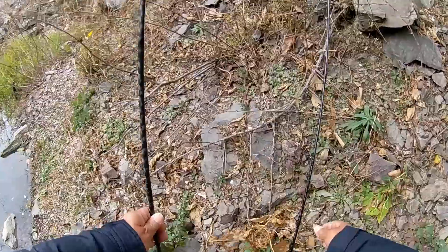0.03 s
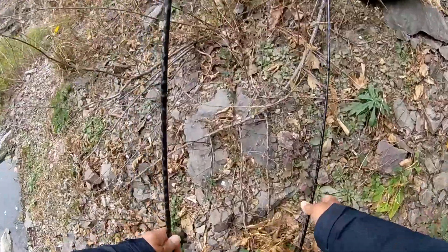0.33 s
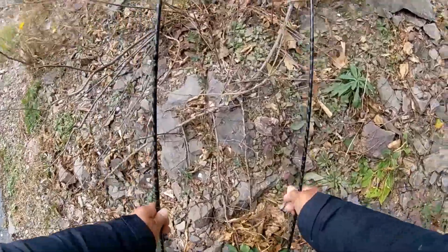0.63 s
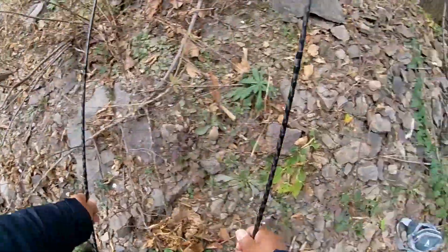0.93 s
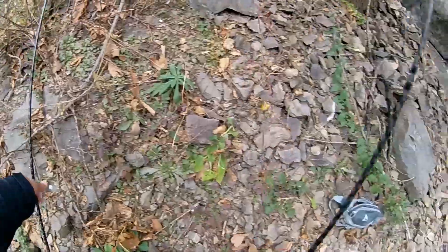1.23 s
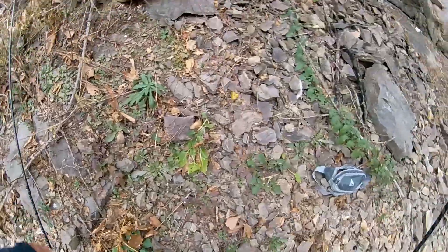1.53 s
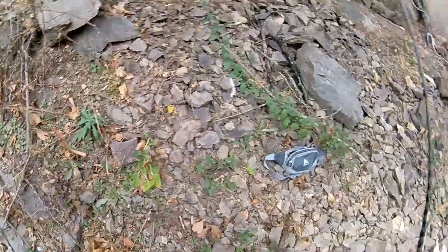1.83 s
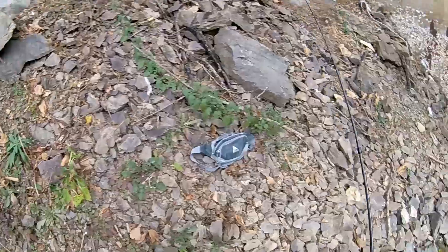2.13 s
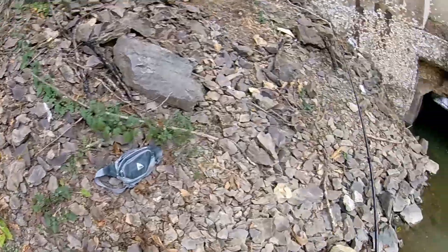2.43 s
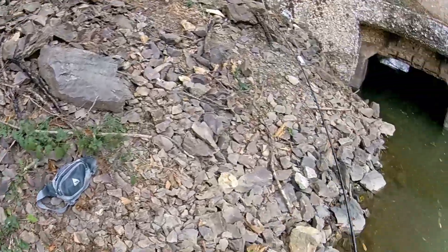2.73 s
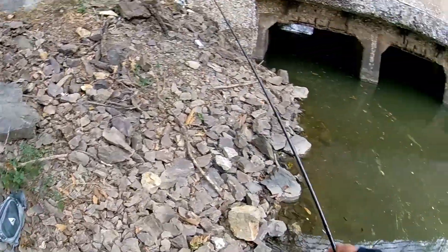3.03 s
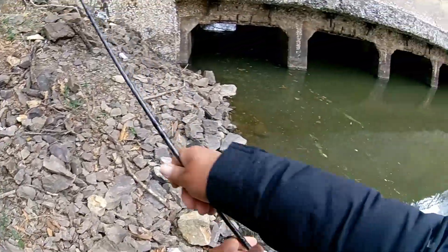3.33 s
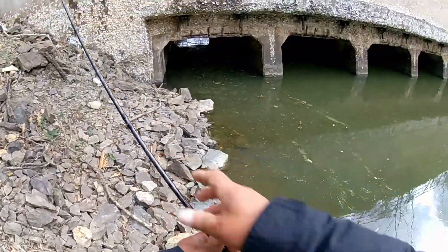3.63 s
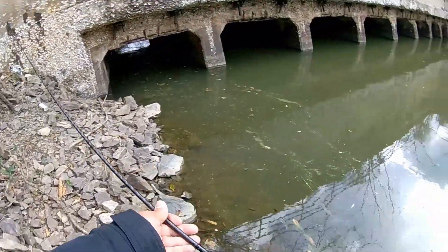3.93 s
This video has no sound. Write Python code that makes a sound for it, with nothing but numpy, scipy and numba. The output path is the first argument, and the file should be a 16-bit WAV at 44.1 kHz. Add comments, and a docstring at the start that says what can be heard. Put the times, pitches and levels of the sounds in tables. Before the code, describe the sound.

Wind buffets the microphone, then loose stones crunch underfoot with sleeve rustles and fishing rod ticks.

```python
"""Turning on loose slate

An angler turns round on a bank of loose slate, rods in hand, heard from a camera worn on the body.
Turbulent air buffets the microphone, hardest at first. Stones grind and knock underfoot, jacket sleeves
swish by stick-slip friction, and rod and line tick in the fingers, over a soft outdoor hiss."""
import sys
import numpy as np
from scipy import signal
from scipy.fft import rfft, irfft
from scipy.io import wavfile
from scipy.ndimage import uniform_filter1d
from numba import njit

SR = 44100
rng = np.random.default_rng(int(sys.argv[2]) if len(sys.argv) > 2 else 0)


def unload_audio(sound):
    """Save the sound as a 16-bit wav file, at the path given as the first command line argument."""
    columns = np.transpose(np.atleast_2d(sound))
    # keep every value between -1 and 1, then stretch to whole-number steps
    steps = np.round(np.clip(columns, -1, 1) * 32767)
    wavfile.write(sys.argv[1], SR, steps.astype(np.int16))


N = 176400


# strength of the buffeting: time_s, level_db
WIND_LEVEL = [(0, -16.5), (.045, -26), (.07, -10.5), (.1, -12.5), (.165, -26), (.22, -16), (.31, -16),
              (.45, -19), (.5, -33.5), (.55, -27.5), (.58, -34), (.635, -23), (.7, -36.5), (.74, -20.5),
              (.78, -40.5), (.83, -29), (.86, -59), (.89, -33), (.97, -40), (1.01, -30), (1.085, -28),
              (1.11, -35), (1.185, -41.5), (1.26, -33), (1.35, -51), (1.47, -56), (1.7, -63)]
# response of the microphone port: frequency_hz, gain_db
PORT_RESPONSE = [(28, -45), (45, -13.5), (65, 0), (130, 0), (250, -1), (500, 0.5), (1000, -1.5)]

def wind():
    """Turbulent pressure at the microphone: a rumble whose bandwidth grows with its strength."""
    full_corner_hz, full_db, octaves_per_db = 237, -11.5, .04
    level_db = curve(WIND_LEVEL)
    relative_db = np.maximum(level_db - full_db, -28)  # weaker wind gets no duller
    corner_hz = full_corner_hz * 2 ** (octaves_per_db * relative_db)
    rumble = rng.standard_normal(N)
    for damping in (1.2, 1.73):
        rumble = state_variable_filter(rumble, corner_hz, damping)[0]
    return steady(colour(rumble, PORT_RESPONSE)) * undb(level_db)


# single eddies striking the microphone: centre_s, peak_db, frequency_hz
EDDY_PULSES = [(.058, -6.5, 290), (0.072, -7, 258), (.075, -13, 496), (0.099, -22, 200), (0.141, 0, 115),
               (.177, -20.5, 436), (.185, -12, 302), (0.215, -0.5, 132), (0.23, -7.5, 184),
               (0.262, -3.5, 151), (0.277, -6, 210), (0.314, -7.5, 220), (.356, -26, 374),
               (0.395, -12, 230), (.458, -14.5, 215), (0.55, -16.5, 100), (0.644, -36, 130),
               (0.808, -14.5, 125), (0.999, -20.5, 110), (1.065, -20, 130), (1.082, -15, 110)]

def eddies():
    """A passing vortex is a pressure pulse with a dip on either side (a Ricker wavelet)."""
    out = np.zeros(N)
    for centre_s, peak_db, hz in EDDY_PULSES:
        offset_squared = np.minimum((np.pi * hz * (clock() - centre_s)) ** 2, 100)
        out += undb(peak_db) * (1 - 2 * offset_squared) * np.exp(-offset_squared)
    return out


# light puffs of air: centre_s, width_s, level_db
PUFF_SWELLS = [(1.22, .04, -36.5), (1.284, 0.022, -45), (1.331, 0.053, -36), (1.396, 0.026, -45.5),
               (1.544, 0.034, -42), (1.764, 0.036, -33.5), (1.846, 0.019, -28), (2.412, 0.043, -35),
               (2.498, 0.065, -31.5), (2.573, 0.023, -34), (2.67, 0.078, -41.5), (3.399, 0.033, -28.5)]
# spectrum of a puff: frequency_hz, gain_db
PUFF_SPECTRUM = [(28, -41), (45, -9.5), (65, 2), (90, -2), (130, -11.5), (200, -21.5), (400, -35),
                 (1000, -80)]

def puffs():
    """Weak turbulence holds its energy in the bass; each puff swells and fades as a Gaussian."""
    rumble = colour(rng.standard_normal(N), PUFF_SPECTRUM)
    swell = sum(undb(level_db) * np.exp(-2 * ((clock() - centre_s) / width_s) ** 2)
                for centre_s, width_s, level_db in PUFF_SWELLS)
    return steady(rumble) * swell


# stones shifting underfoot: start_s, attack_s, decay_s, level_db
SLATE_SHIFTS = [(.917, 0.013, 0.047, -34.5), (.96, 0.037, 0.47, -42.5), (1.25, 0.023, 0.08, -55),
                (1.86, 0.023, 0.12, -45), (1.95, 0.007, 0.15, -48), (2.42, 0.16, .3, -50),
                (3.068, 0.0024, 0.048, -30.5), (3.13, 0.044, 0.4, -43.5), (3.258, 0.017, 0.14, -36.5),
                (3.32, 0.053, 0.21, -33), (3.76, 0.02, 0.17, -50.5)]
# spectrum of grinding slate: frequency_hz, gain_db
SLATE_SPECTRUM = [(80, -18.5), (200, -2), (450, -8), (700, -16), (1100, -22), (2500, -28.5), (5000, -37),
                  (7500, -51), (10000, -39), (15000, -58)]

def grinding():
    """Granular friction: dense tiny impacts between loaded stones merge into a crunch."""
    return colour(grains(per_s=1800, scatter_db=4), SLATE_SPECTRUM) * bursts(SLATE_SHIFTS)


# stone striking packed ground: start_s, peak_db, pitch_hz
STONE_KNOCKS = [(1.586, -27.5, 192), (1.882, -33, 494), (1.955, -34.5, 500), (3.077, -32, 292),
                (3.094, -27.5, 263), (3.185, -25.5, 260), (3.185, -36, 690), (3.275, -26.5, 435),
                (3.381, -26, 474), (3.386, -26, 656), (3.411, -26.5, 420)]

def knocks(t60_s=.02, contact_s=.00065):
    """A soft impact excites one heavily damped mode, heard as a dull knock."""
    out, t = np.zeros(N), np.arange(SR // 10) / SR
    rise = 1 - np.exp(-(t / contact_s) ** 2)
    for start_s, peak_db, pitch_hz in STONE_KNOCKS:
        add(out, start_s, np.sin(2 * np.pi * pitch_hz * t) * fade(t, t60_s) * rise, peak_db)
    return out


# rubs of sleeve and hand: start_s, attack_s, decay_s, level_db
SCRAPE_STROKES = [(.062, 0.0063, 0.18, -38.5), (.13, 0.18, 0.12, -46.5), (.918, 0.011, 0.032, -32.5),
                  (.99, 0.012, 0.12, -50.5), (1.016, .002, 0.0067, -46), (1.1, 0.1, 0.25, -51),
                  (3.073, 0.0013, 0.072, -35), (3.096, 0.00076, 0.0051, -28), (3.11, 0.0079, 0.48, -47.5),
                  (3.35, 0.026, .09, -48), (3.38, 0.00087, 0.013, -33.5), (3.78, 0.013, .1, -44.5),
                  (3.8, 0.028, 0.11, -50)]
# spectrum of coarse rubbing: frequency_hz, gain_db
SCRAPE_SPECTRUM = [(200, 14.5), (500, 7.5), (1200, 4.5), (2500, 1), (4400, -1), (6000, -8), (7700, -32.5),
                   (10000, -16), (15000, -62)]

def scrapes():
    """Stick-slip friction: cloth catches and releases in tiny clicks that form a coarse scrape."""
    return colour(grains(per_s=3500, scatter_db=1.5), SCRAPE_SPECTRUM) * bursts(SCRAPE_STROKES)


# slides of nylon and line: start_s, attack_s, decay_s, level_db
SWISH_STROKES = [(.06, 0.0074, 0.041, -45), (.521, 0.0043, 0.044, -50), (.56, 0.018, 0.15, -59.5),
                 (.619, 0.002, .015, -43), (.638, 0.0022, 0.0041, -40), (.78, 0.017, 0.6, -57),
                 (.921, 0.0092, 0.088, -41.5), (.98, 0.043, 0.011, -46.5), (1.088, .005, .012, -44),
                 (1.67, 0.0062, 0.11, -56.5), (1.87, 0.064, 0.33, -61), (2.8, 0.065, 0.065, -64.5),
                 (3.074, 0.0077, .04, -36), (3.11, 0.0076, 0.15, -49), (3.35, .03, 0.099, -53.5),
                 (3.712, 0.0087, 0.056, -46), (3.777, .008, 0.065, -48.5), (3.796, .004, 0.014, -41),
                 (3.815, 0.021, 0.021, -47.5)]
# spectrum of sliding nylon: frequency_hz, gain_db
SWISH_SPECTRUM = [(1500, -23.5), (4000, -10.5), (5800, -10), (7500, -12), (9200, -4.5), (10500, -2),
                  (12500, -17), (15500, -15)]

def swishes():
    """Stick-slip friction on nylon and line: denser, brighter clicks blend into a swish."""
    return colour(grains(per_s=5000, scatter_db=5), SWISH_SPECTRUM) * bursts(SWISH_STROKES)


# contacts of rod, line and stone chips: start_s, peak_db, pitch_hz, t60_s
TICK_CONTACTS = [(0.077, -32, 2580, .02), (.097, -25.5, 2640, 0.025), (.488, -35, 4020, .02),
                 (0.491, -35, 2720, 0.024), (.781, -30.5, 3020, .02), (.784, -43, 4140, 0.027),
                 (0.824, -29.5, 1090, .03), (0.824, -31, 2900, 0.011), (.945, -25, 10500, 0.009),
                 (1.017, -31, 10470, 0.011), (1.017, -34, 1200, .014), (1.353, -36.5, 4550, 0.022),
                 (1.586, -41, 2500, .012), (1.798, -40, 2200, .016), (2.194, -45.5, 5400, .016),
                 (2.305, -43, 10800, .014), (2.731, -56, 7000, 0.058), (3.075, -22, 3720, 0.012),
                 (3.098, -24, 3300, 0.011), (3.124, -20.5, 9500, 0.013), (3.124, -33, 4400, .022),
                 (3.381, -30.5, 3260, 0.0093), (3.691, -44, 8850, 0.021), (3.705, -33.5, 9000, 0.026),
                 (3.721, -37, 9660, 0.032), (3.731, -39, 5700, .022), (3.779, -36.5, 6450, .014),
                 (3.799, -36, 6570, .014), (3.798, -29, 10250, .016), (3.818, -32.5, 10300, 0.0098)]
# resonances of a tick: pitch_ratio, gain_db, t60_ratio
TICK_RESONANCES = [(.66, -7.5, 0.31), (.93, -16, 0.56), (1, -3, 0.75), (1.13, -6, 0.46), (1.45, -27, .5)]

def ticks(rise_s=.00048, contact_s=.0006, crack_db=-9, crack_t60_s=.012):
    """Modal ringing: a brief rough contact excites a few modes, with a crack of noise near their pitch."""
    out, t = np.zeros(N), np.arange(SR // 20) / SR
    rise = 1 - np.exp(-t / rise_s)
    # the microphone rolls off the ticks' highest treble
    rolloff = signal.butter(6, 11200, fs=SR, output="sos")
    for start_s, peak_db, pitch_hz, t60_s in TICK_CONTACTS:
        roughness, crack = rng.standard_normal((2, len(t)))
        force = roughness * rise * np.exp(-t / contact_s)
        modes = sum(undb(gain_db) * np.sin(2 * np.pi * pitch_hz * ratio * t) * fade(t, t60_s * t60_ratio)
                    for ratio, gain_db, t60_ratio in TICK_RESONANCES)
        ring = signal.fftconvolve(modes, force)[:len(t)]
        for _ in range(2):
            crack = state_variable_filter(crack, np.full(len(t), float(pitch_hz)), 1.2)[1]
        crack = crack * rise * fade(t, crack_t60_s)
        tick = ring / np.abs(ring).max() + undb(crack_db) * crack / np.abs(crack).max()
        add(out, start_s, signal.sosfilt(rolloff, tick), peak_db)
    return out


# spectrum of the outdoor hiss: frequency_hz, gain_db
HISS_SPECTRUM = [(18, -52), (30, -16.5), (59, -4.5), (140, -3), (219, -6), (249, -5), (379, -4),
                 (410, -7.5), (455, -6), (639, -10), (1360, -17), (3320, -23), (4190, -20.5), (7080, -34),
                 (10700, -28.5), (15500, -52)]
# strength of the hiss: time_s, level_db
HISS_LEVEL = [(0, -49), (1.3, -50.5), (1.5, -53), (2, -47.5), (2.25, -51.5), (2.7, -50), (2.85, -49),
              (3.03, -52), (3.5, -51), (3.65, -55.5), (3.9, -48.5), (4, -52.5)]

def air(flicker_db=.65, grit_db=-62.5):
    """Ambient noise: a broadband hiss whose level flickers a little, with stray clicks of grit."""
    knots_s = np.linspace(0, N / SR, 80)
    flicker = np.interp(clock(), knots_s, rng.standard_normal(len(knots_s)))
    hiss = colour(rng.standard_normal(N), HISS_SPECTRUM) * undb(curve(HISS_LEVEL) + flicker_db * flicker)
    grit = colour(grains(per_s=120, scatter_db=5), SCRAPE_SPECTRUM)
    return hiss + undb(grit_db) * grit


def undb(db):
    """Decibels to amplitude ratio."""
    return 10 ** (np.asarray(db) / 20)


def unit(x):
    """Normalisation to rms 1."""
    return x / np.sqrt(np.mean(x ** 2))


def clock():
    """Time of each sample in seconds."""
    return np.arange(N) / SR


def curve(rows):
    """Linear interpolation through rows of time_s, value."""
    return np.interp(clock(), *np.array(rows).T)


def fade(t, t60_s):
    """Exponential decay of 60 dB in t60_s."""
    return np.exp(-np.log(1000) * t / t60_s)


def colour(x, spectrum):
    """Spectral shaping by rows of frequency_hz, gain_db; the result has rms 1."""
    hz, db = np.array(spectrum).T
    bins_hz = np.maximum(np.arange(N // 2 + 1) * SR / N, 1)
    gain = undb(np.interp(np.log(bins_hz), np.log(hz), db))
    return unit(irfft(rfft(x) * gain, N))


@njit
def state_variable_filter(x, corner_hz, damping):
    """Two integrators in a loop with a moving corner: row 0 is low-pass, row 1 band-pass."""
    out, band_state, low_state = np.empty((2, len(x))), 0., 0.
    for i in range(len(x)):
        gain = np.tan(np.pi * corner_hz[i] / SR)
        band = (band_state + gain * (x[i] - low_state)) / (1 + gain * (gain + damping))
        low = low_state + gain * band
        band_state, low_state = 2 * band - band_state, 2 * low - low_state
        out[0, i], out[1, i] = low, damping * band
    return out


def steady(x, amount=.66):
    """Envelope compression evens out part of the chance swelling of a rumble."""
    power = uniform_filter1d(np.abs(signal.hilbert(x)) ** 2, size=900)
    return unit(x / (power + 1e-18) ** (amount / 2))


def grains(per_s, scatter_db):
    """Shot noise: tiny impacts at random times, a few larger than the rest."""
    chance, size, sign = rng.random(N), rng.exponential(size=N), rng.choice([-1, 1], N)
    size_db = scatter_db * np.minimum(size, 3)
    return unit((chance < per_s / SR) * sign * undb(size_db))


def bursts(strokes):
    """Envelope of strokes that add in power; each rises over attack_s, then falls 20 dB per decay_s."""
    t, power = clock(), np.zeros(N)
    for start_s, attack_s, decay_s, level_db in strokes:
        rise = np.clip((t - start_s) / attack_s, 0, 1)
        fall = undb(-20 * np.maximum(t - start_s - attack_s, 0) / decay_s)
        power += (undb(level_db) * rise * fall) ** 2
    return np.sqrt(power)


def add(out, start_s, x, peak_db):
    """Mix x in at start_s, scaled to peak_db."""
    i = int(start_s * SR)
    out[i:i + len(x)] += (undb(peak_db) * x / np.abs(x).max())[:N - i]


def scene():
    """Superposition in a free field: nearby sources sum to one channel without reverberation."""
    buffeting = wind() + eddies() + puffs()
    return (buffeting + grinding() + knocks() + scrapes() + swishes() + ticks() + air())[None]


def record(dry, low_hz=36, top_hz=15600):
    """Band limiting: the camera drops the deepest bass and cuts the highest treble."""
    bass_cut = signal.butter(4, low_hz, "high", fs=SR, output="sos")
    treble_cut = signal.ellip(10, .2, 80, top_hz, fs=SR, output="sos")
    return signal.sosfilt(treble_cut, signal.sosfilt(bass_cut, dry))


dry = scene()
out = record(dry)
unload_audio(out)
```